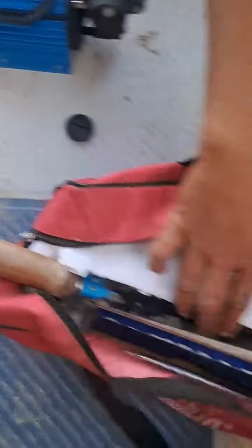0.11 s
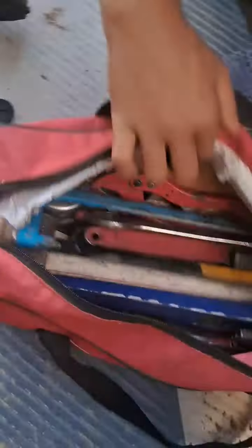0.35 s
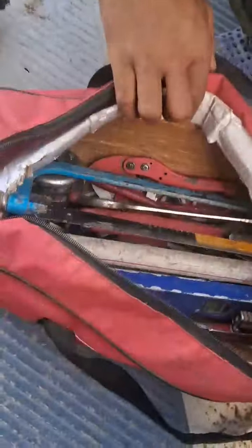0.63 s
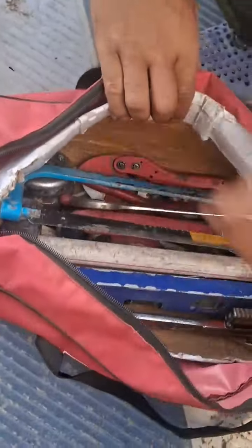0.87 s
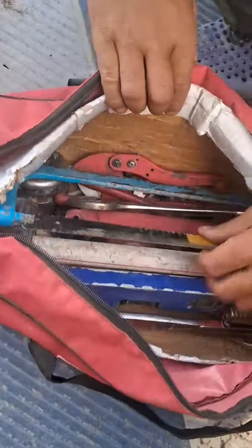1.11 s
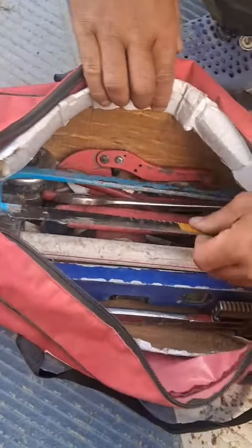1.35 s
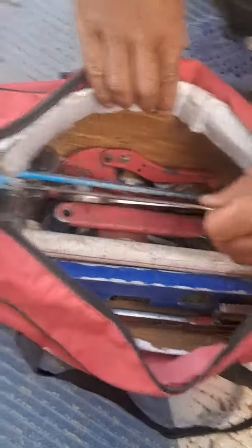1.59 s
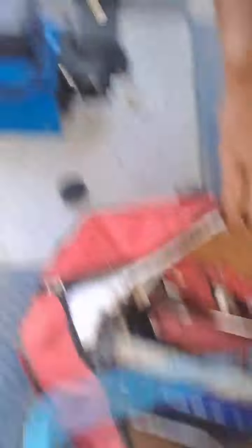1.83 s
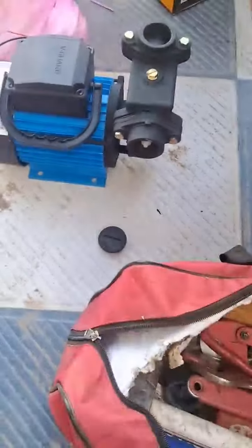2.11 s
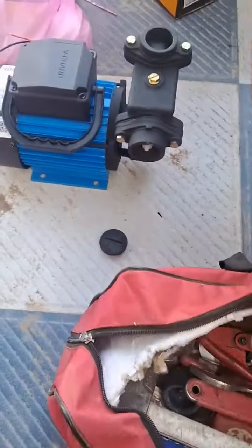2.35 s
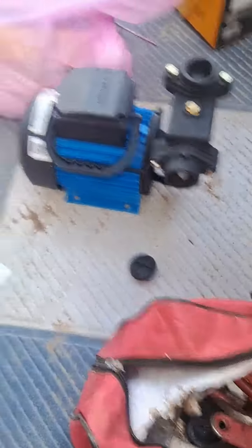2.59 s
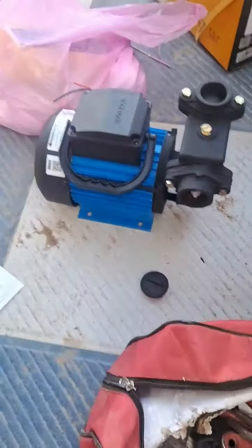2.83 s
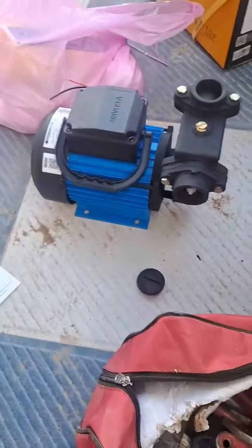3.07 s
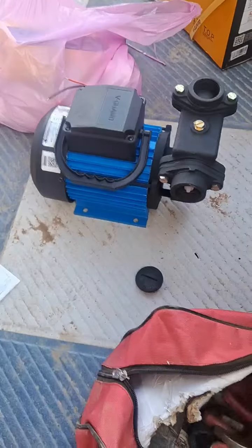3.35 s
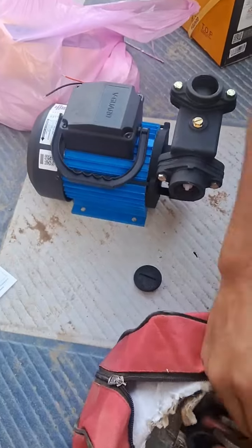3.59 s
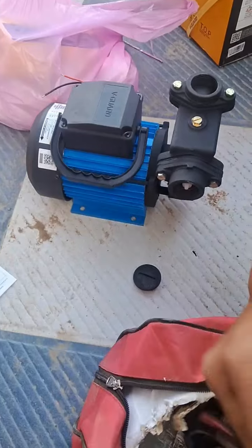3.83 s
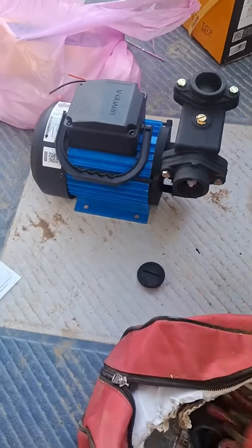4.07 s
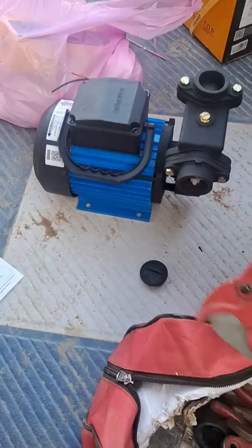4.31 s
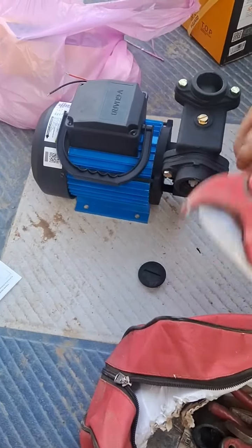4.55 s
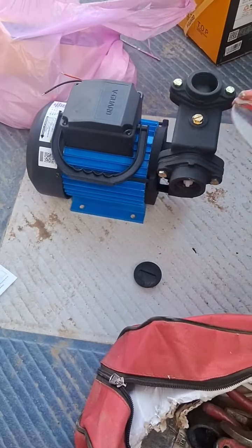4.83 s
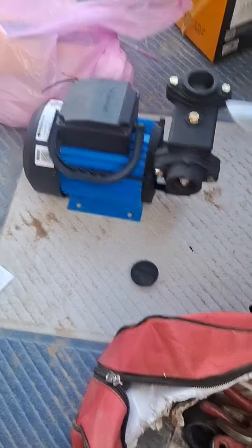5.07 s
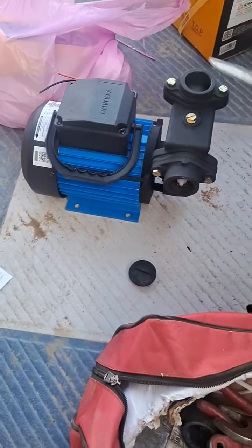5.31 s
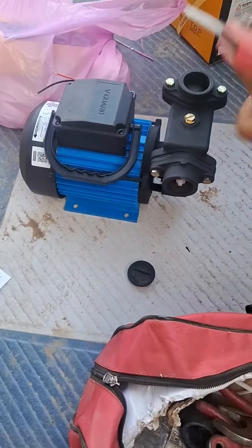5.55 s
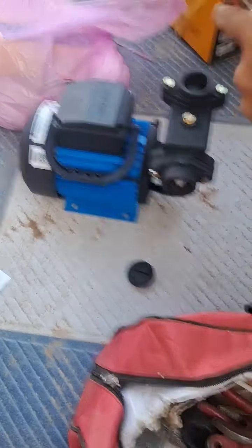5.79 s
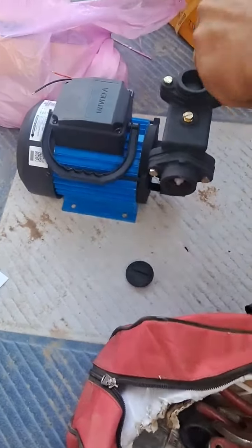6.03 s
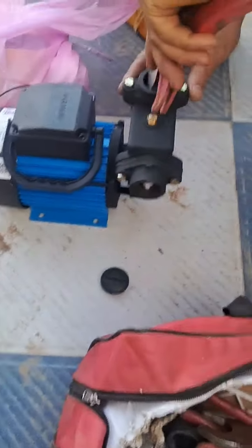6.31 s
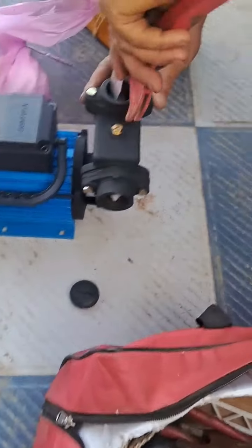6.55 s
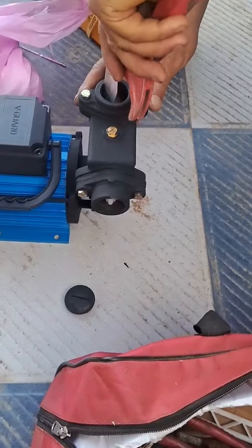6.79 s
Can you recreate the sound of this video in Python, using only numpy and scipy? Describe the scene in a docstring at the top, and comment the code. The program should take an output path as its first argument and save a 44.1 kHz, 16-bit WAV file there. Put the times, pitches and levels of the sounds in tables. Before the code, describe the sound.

Close to a phone microphone, a hand shoves through a loaded fabric bag on a tiled floor. Cloth drags and rustles over low thumps while steel tools clack dully. A denser clatter peaks around the middle with a clear bright bar ring. A small cutter then clicks sharply several times, followed by sparse small ticks, one soft dull knock and barely audible scuffs over low rumble and hiss.

```python
"""Digging through a bag of steel tools

A hand digs through a canvas bag of tools on a tiled floor, close to a two-port phone microphone.
Cloth rustles as random slips, the loaded bag thumps as decaying sines, tools clack as noise bursts that ring
damped modes. A steel bar rings out, then a ratchet pipe cutter is lifted, clicked open and set to a pipe
while the scene falls quiet, with a late dull knock and faint scuffs, over low rumble and hiss."""
import sys
import numpy as np
from scipy import signal
from scipy.fft import rfft, irfft, next_fast_len
from scipy.io import wavfile
from scipy.ndimage import uniform_filter1d

SR = 44100
rng = np.random.default_rng(int(sys.argv[2]) if len(sys.argv) > 2 else 0)


def amplitude_ratio(level_db):
    """Convert a level in decibels to the matching linear amplitude (field) ratio."""
    exponent = np.asarray(level_db, float) / 20
    return 10 ** exponent


def generate_wav(sig):
    """Save sig (samples, or channels by samples) to the path in sys.argv[1] as 16-bit PCM at SR."""
    pcm = np.round(np.clip(np.atleast_2d(sig).T, -1, 1) * 32767).astype(np.int16)
    wavfile.write(sys.argv[1], SR, pcm)


N = 304719

# Tools clack in the pile; the last row is a dull knock late in the quiet. Each row: time in seconds,
# level in dB, favoured pitch of the spot struck in Hz, brightness in dB per octave, chatter in seconds.
CLACKS = [(.1952, -49, 5640, 1, 0.017), (.2222, -23, 885, -11.5, 0.0018),
          (.3208, -31.5, 1210, -10.5, 0.0029), (.3597, -25.5, 13400, 4, 0.0032),
          (.376, -40, 4930, -1, 0.0029), (.4332, -22, 4380, -1, 0.0018), (.564, -22, 2030, -12.5, 0.0044),
          (.5914, -34.5, 2160, -5.5, 0.0072), (.693, -49, 1320, 13, 0.042), (.8624, -39, 3490, -3, 0.019),
          (1.5598, -35.5, 1310, -2, 0.021), (1.6012, -36, 12550, -1.5, 0.0086),
          (1.9629, -14.5, 2070, -4.7, 0.0035), (1.9741, -23.5, 3610, 2.8, 0.0041),
          (2.019, -40.5, 1350, 12.5, 0.0059), (2.143, -38, 8700, 10, 0.0033),
          (2.179, -33.5, 940, -12, 0.0035), (2.4502, -43, 1180, -2.5, 0.0065),
          (2.5119, -36.5, 1850, -7.5, 0.002), (2.6678, -48, 3900, -0.5, 0.0054),
          (2.7486, -38.5, 1860, -7.5, 0.0061), (2.764, -28.5, 1850, 0.5, 0.001),
          (2.9465, -29.5, 7700, 3, 0.037), (2.9706, -24, 2000, 4, 0.0049), (3.012, -21, 970, 1.4, 0.0097),
          (3.0394, -34, 5220, 2, 0.012), (3.122, -40, 970, -2.2, 0.0027), (3.14, -36, 980, -4, .016),
          (3.3496, -39, 2020, -1.3, 0.029), (3.3872, -29.5, 2720, -3.7, 0.0073),
          (3.3993, -34, 7630, -4, 0.011), (3.4381, -31, 3120, -1.9, 0.013), (3.4705, -28, 3540, 4.2, 0.01),
          (3.48, -26, 4870, 5, 0.0062), (3.5019, -16, 3330, -0.5, 0.0011), (3.5306, -33, 1270, -3, 0.011),
          (3.5778, -21.5, 2110, 1, 0.013), (3.6094, -23, 1030, -1, 0.0033),
          (3.6626, -22, 5330, 2.7, 0.0013), (3.8188, -35, 2700, -8.5, .02),
          (3.8447, -21.5, 5000, -2.5, 0.025), (3.861, -16, 1990, -8, 0.003), (3.9204, -28, 5200, 3, 0.021),
          (4.0, -44, 3686, -1, 0.0088), (5.846, -39.5, 1300, -8, .0015)]
# Blows on the steel bar, the last one with the bar free. Each row: time in seconds, level in dB,
# pitch of the spot struck in Hz, brightness in dB per octave, chatter in seconds.
BAR_BLOWS = [(1.7639, -22.5, 4997, 1.8, 0.061), (1.8532, -30.5, 5046, 0.63, 0.036),
             (3.8591, -19, 4970, 0.77, 0.048)]
# The cutter clicks. Each row: time in seconds, level in dB, favoured pitch in Hz, chatter in seconds.
CLICKS = [(4.2746, -29.5, 5540, 0.0075), (4.2816, -16.5, 3630, 0.012), (4.321, -28, 4770, 0.0019),
          (4.342, -17, 5300, .004), (4.4018, -37, 5140, 0.003), (4.4126, -29, 4530, 0.002),
          (4.4332, -17.5, 4400, .005), (4.554, -36.5, 4370, 0.001), (4.647, -39, 2080, .003),
          (4.688, -18.5, 2018, 0.0034), (4.8377, -36, 1820, 0.004), (4.8703, -45.5, 1700, .004),
          (4.9561, -39.5, 2010, 0.0034), (5.113, -57, 4830, .003), (5.1502, -50, 2070, 0.0027),
          (5.5196, -36, 3490, 0.0096), (5.645, -36, 4910, 0.0063), (5.7195, -35.5, 6450, .004),
          (5.7293, -36.5, 3500, 0.011), (5.7478, -39.5, 1680, 0.0061), (5.8205, -38, 3370, 0.0065),
          (5.8421, -39.5, 1280, 0.0018), (6.1203, -57.5, 2990, .004), (6.3012, -59, 3070, .004),
          (6.3417, -47, 4820, .006), (6.6057, -47.5, 4700, 0.0057)]
# A tool left free sings one note. Each row: start in seconds, level in dB, pitch in Hz, T60 in seconds.
TINGS = [(.075, -55, 9500, 0.11), (0.194, -50, 5640, 0.4), (.433, -43, 14580, 0.36),
         (.865, -53.5, 8200, 0.14), (1.603, -40, 12500, 0.047), (1.973, -34.5, 5310, 0.13),
         (1.99, -34, 13100, .072), (3.402, -36, 7580, .07), (4.284, -44, 3080, 0.23),
         (4.435, -44, 7500, 0.064), (4.554, -49.5, 4365, 0.093), (4.281, -18.5, 4960, 0.054),
         (4.839, -37.5, 1720, 0.13), (4.87, -45.5, 1790, 0.083), (5.22, -71, 4600, 0.16),
         (5.522, -46.5, 3105, 0.38), (5.647, -47, 3100, 0.15)]
# Modes of the damped steel pile. Each row: frequency in Hz, relative level in dB.
PILE_MODES = [(1000, 0.5), (1300, -5.1), (1550, -7.5), (1950, 0), (2290, -4), (2700, -4), (3200, -7),
              (3700, 1.1), (4480, 4.5), (5000, 4.5), (6500, -12.5), (8440, 1), (10300, -2), (12700, 1.9),
              (14200, -1.5)]
# Modes of the cutter. Each row: frequency in Hz, relative level in dB.
CUTTER_MODES = [(1250, -19.5), (1710, -10), (2030, 2.6), (3100, 11.5), (3460, 5.8), (3750, 9), (4390, 11.5),
                (5000, 6.5), (5340, 10), (6500, -13.5), (7400, -14), (9100, -5), (11200, -3.3),
                (13000, -10), (15080, -11.5)]
# Modes of the free bar. Each row: frequency in Hz, relative level in dB, T60 in seconds.
BAR_MODES = [(1572, -28, 0.19), (1938, -30, 0.21), (2714, -14, 0.1), (2746, -14, 0.1), (3100, -30, .25),
             (3806, -32, 0.3), (4378, -8, 0.14), (4748, -35, 0.41), (4968, -9, 0.55), (5448, -24, 0.15),
             (6481, -30, 0.19), (6831, -45, 0.34), (7506, -15, 0.1), (7604, -14, 0.14), (7784, -34, 0.19),
             (8482, -21, 0.33), (9354, -22, 0.27), (9449, -22, 0.25), (10000, -20, 0.17),
             (10800, -26, 0.21), (11510, -37, 0.23), (12070, -46, 0.24), (13070, -30, 0.24),
             (13530, -32, 0.17), (14580, -29, 0.15), (15130, -24, 0.14), (15460, -57, 0.33)]
# Contact crack of pile and bar. Each row: frequency in Hz, relative density in dB per Hz.
CRACK_SPECTRUM = [(290, -54.5), (500, -21), (1060, -13), (1300, -28.5), (1930, -2.5), (2890, -10),
                  (3200, -6), (6700, -10), (12500, -13), (16000, -23)]
# Contact crack of the cutter. Each row: frequency in Hz, relative density in dB per Hz.
SNAP_SPECTRUM = [(590, -64), (1000, -39), (2870, -27.5), (3710, 2), (4020, -9.5), (5020, -10.5),
                 (7880, -10), (15100, -10.5), (16000, -41)]
# The hand shoves through the bag; the last three rows are faint scuffs in the quiet. Each row: centre in
# seconds, load shifting in dB, cloth drag in dB, hold in seconds, fine fizz in dB.
SHOVES_AND_SCUFFS = [(.02, -43.5, -52.5, 0.17, -60), (.1, -42, -68, 0.025, -58.5),
                     (.23, -39, -53.5, 0.068, -57), (.45, -33.5, -42.5, 0.19, -47.5),
                     (.7, -45, -58, 0.12, -69.5), (.95, -58, -63.5, 0.3, -75),
                     (1.17, -43.5, -48, 0.086, -60), (1.42, -43, -52.5, 0.021, -60),
                     (1.56, -37, -54, 0.0067, -56), (1.8, -30, -36.5, 0.02, -43),
                     (1.95, -30.5, -39.5, 0.092, -44.5), (2.18, -43.5, -59.5, 0.1, -60.5),
                     (2.32, -67, -67.5, 0.087, -74.5), (2.47, -41, -52, 0.03, -57),
                     (2.76, -37.5, -53.5, 0.019, -62), (3.0, -31, -42.5, 0.013, -44),
                     (3.2, -46, -54, 0.37, -60.5), (3.5, -47, -46.5, 0.071, -50.5),
                     (3.6, -29.5, -37.5, 0.0084, -53), (3.88, -39, -43.5, 0.029, -46.5),
                     (6.2, -64.5, -79, .04, -101), (6.36, -64, -70.5, 0.029, -87),
                     (6.63, -67, -72, 0.032, -90.5)]
# Fingers slide on the cutter. Each row: centre in seconds, scrape in dB, fizz in dB, hold in seconds.
SLIDES = [(4.45, -58.5, -66, .02), (4.86, -59.5, -64.5, 0.052), (4.96, -57, -58, 0.025),
          (5.15, -70.5, -79, 0.042), (5.39, -79, -67, 0.047), (5.58, -73, -62, 0.065),
          (5.74, -63.5, -57, .03), (5.93, -70.5, -71, .08), (6.35, -91, -77, 0.021),
          (6.61, -106, -72, 0.019)]
# Coarse cloth drag. Each row: frequency in Hz, relative density in dB per Hz.
DRAG_SPECTRUM = [(290, -26), (500, -8), (629, -8.5), (1290, -9), (1510, -13.5), (1930, -11.5),
                 (2510, -17.5), (2870, -22.5), (6000, -29.5), (7800, -62), (13200, -120)]
# Gritty scrape. Each row: frequency in Hz, relative density in dB per Hz.
SCRAPE_SPECTRUM = [(530, -47), (900, -15.5), (1400, -11), (1750, -2), (2100, -2.5), (2630, -16), (3030, -5),
                   (4160, -15.5), (6000, -14), (7800, -45), (13200, -120)]
# Fine fizz. Each row: frequency in Hz, relative density in dB per Hz.
FIZZ_SPECTRUM = [(2060, -23), (3500, -6.5), (4540, -12), (4900, -7.5), (5290, -12), (8800, -14),
                 (13100, -12), (16000, -19.5)]
# Low thumps of the load; the last is the low body of a late knock. Each row: start in seconds,
# level in dB, pitch in Hz.
THUMPS = [(.023, -28.5, 260), (0.086, -28.5, 281), (0.221, -29, 390), (.265, -26, 380), (0.443, -21.5, 284),
          (0.568, -19.5, 277), (0.634, -24, 206), (.68, -29, 202), (0.707, -19.5, 190), (0.864, -34.5, 279),
          (1.55, -35, 377), (1.737, -34, 285), (1.801, -19, 229), (1.853, -23, 540), (1.962, -33, 191),
          (2.177, -34.5, 243), (2.453, -25.5, 370), (2.625, -35.5, 302), (2.745, -23, 302),
          (2.965, -23.5, 318), (3.008, -22, 315), (3.179, -29.5, 274), (3.475, -19.5, 318),
          (3.503, -15.5, 349), (3.594, -13.5, 299), (3.856, -30.5, 287), (4.039, -45.5, 397),
          (5.846, -31, 109.4)]
# The loaded bag. Each row: frequency in Hz, relative density in dB per Hz.
BODY_SPECTRUM = [(65, -27), (110, -1.5), (209, -3), (285, 1.5), (371, -1), (450, -6.5), (498, -4.5),
                 (609, -17.5), (700, -22.5), (910, -39.5), (1540, -120)]
# The hand on the phone. Each row: time in seconds, rumble in dB.
SHAKE = [(0.0, -57), (.2, -56), (0.338, -39.5), (.56, -48), (0.738, -36.5), (.9, -59.5), (4.1, -59.5),
         (5.75, -67.5), (5.85, -49), (5.95, -56.5), (6.6, -64.5), (6.74, -52.5), (6.91, -57)]
# Low rumble. Each row: frequency in Hz, relative density in dB per Hz.
RUMBLE_SPECTRUM = [(13, -55.5), (22, -17), (42, -9.5), (54, 1.5), (92, 1), (124, 1), (160, -5),
                   (210, -26.5), (350, -120)]
# Background air. Each row: frequency in Hz, relative density in dB per Hz.
AIR_SPECTRUM = [(15, -45.5), (25, -15), (59, -2.5), (123, -27), (249, -17.5), (450, -28), (600, -42.5),
                (800, -49.5), (2050, -47.5), (2610, -47.5), (2840, -51.5), (4140, -57.5), (4490, -45.5),
                (4870, -55.5), (7700, -64.5), (8000, -52), (8300, -64.5), (16000, -80)]
# Likeness of the two ports. Each row: frequency in Hz, left-right likeness from 0 to 1.
LIKENESS = [(40, 0.99), (200, 0.96), (400, 0.99), (800, 0.15), (5000, 0.087), (15000, 0.2)]
# The ports hear differently. Each row: frequency in Hz, left over right in dB.
LEAN = [(60, -3), (120, -1.5), (240, -3), (480, -6.5), (950, 2.5), (1890, -4.5), (3770, -2.5), (7520, 0.5),
        (15000, 3)]
# Phase between the ports. Each row: frequency in Hz, lag of the left port in radians.
LAG = [(100, 0.13), (300, 0.1), (700, 0.22), (16000, 1)]

PILE_T60_S, CUTTER_T60_S, THUMP_T60_S, ROOM_T60_S = .016, .026, .055, .035
CLICK_BRIGHT_DB_PER_OCT = -1.3
CUTTER_LOW_HZ = 1050  # the cutter's clicks carry little below this
SHOVE_RISE_DB_S, SHOVE_FALL_DB_S = 174, 193
SLIDE_RISE_DB_S, SLIDE_FALL_DB_S, RESTING_DB = 219, 207, -81.5
BAG_RUMBLE_DB = -19  # relative to the load shifting
ROOM_DB, AIR_DB = -2, -59.5


def evened(x):
    """Scales to rms 1."""
    return x / np.sqrt(np.mean(x ** 2) + 1e-20)


def read(points, hz):
    """Reads a curve on a log-frequency axis."""
    f, value = np.transpose(points)
    return np.interp(np.log(hz + 1), np.log(f + 1), value)


def colour(x, points):
    """Shapes the last axis by a spectrum."""
    size = next_fast_len(x.shape[-1])
    gain = amplitude_ratio(read(points, np.fft.rfftfreq(size, 1 / SR)))
    return irfft(rfft(x, size) * gain, size)[..., :x.shape[-1]]


def add(mix, start_s, sound):
    """Mixes a sound in at a time."""
    part = mix[..., round(start_s * SR):][..., :sound.shape[-1]]
    part += sound[..., :part.shape[-1]]


def grains(per_s, spread_db):
    """Sparse slips of random sign and exponentially spread level, bunched in time."""
    bunch = amplitude_ratio(1.53 * evened(uniform_filter1d(rng.standard_normal(N), 500)))
    spread = amplitude_ratio(spread_db * np.minimum(rng.exponential(1, (2, N)), 4))
    size = spread * rng.standard_normal((2, N))
    return bunch * size * (rng.random((2, N)) < per_s / SR)


def strokes(rows, index, rise_db_s, fall_db_s):
    """Each stroke swells, holds and dies away at steady slopes; their powers add up to one gain."""
    t, power = np.arange(0, N + 64, 64) / SR, 0
    for row in rows:
        centre_s, half_hold_s = row[0], row[3] / 2
        before = np.maximum(centre_s - half_hold_s - t, 0)
        after = np.maximum(t - centre_s - half_hold_s, 0)
        power = power + amplitude_ratio(row[index] - rise_db_s * before - fall_db_s * after) ** 2
    return np.interp(np.arange(N) / SR, t, np.sqrt(power))


def strike(rows, modes, crack_spectrum, near_db, ring_db, settle_db, loose, square, solid=0):
    """A contact burst cracks and rings the modes, those near the given pitch raised or lowered by near_db."""
    out, t = np.zeros((2, N)), np.arange(SR // 2) / SR
    hz, db, t60 = np.transpose(modes)[..., None]
    long = t[:round(min(.49, t60.max()) * SR)]
    short = t[:4096]
    u = np.maximum(short - 128 / SR, 0)  # time since contact
    for s, level_db, spot_hz, bright_db, chatter_s in rows:
        noise, luck = rng.standard_normal((3, 4096)), rng.standard_normal((2, len(hz), 1))

        attack = 1 - np.exp(-u / min(0.14 * chatter_s, .002))
        blow = attack * np.exp(-(u / chatter_s) ** square)
        settle = amplitude_ratio(settle_db) * np.exp(-u / 0.031) * (1 - short / t[4095])
        rattle = (1 - np.exp(-u / 0.0025)) * settle  # loose parts rattle on
        touch = blow + rattle

        octaves = np.log2(hz / spot_hz)
        near = np.exp(-(octaves / 0.1) ** 2)
        # grip and neighbours shift the modes
        pitch = near * spot_hz + (1 - near) * hz * (1 + loose * luck[0])
        mode_db = db + near_db * near + bright_db * octaves + 60 * loose * luck[1]
        rings = amplitude_ratio(mode_db - 60 * long / t60) * np.sin(2 * np.pi * pitch * long)

        drive = (1 - solid) * noise[2] * (blow + 0.47 * rattle)  # the rattle is too soft to ring much
        drive[160] += solid  # one clean blow
        ring = signal.fftconvolve(drive, rings.sum(0))
        ring = ring / np.sqrt(uniform_filter1d(ring ** 2, 128).max())
        sound = np.tile(amplitude_ratio(ring_db - 0.75 * np.log2(spot_hz / 2500)) * ring, (2, 1))

        tilted = [(f, d + bright_db * np.log2(f / spot_hz)) for f, d in crack_spectrum]
        crack = colour(touch * noise[:2], tilted)
        sound[:, :4096] += crack * np.linalg.norm(touch) / np.linalg.norm(crack[0])
        add(out, s - .004, amplitude_ratio(level_db - 9) * sound)
    return out


def pile():
    """Tools clack and a late knock sounds dully; the modes are damped within milliseconds."""
    modes = [(hz, db, PILE_T60_S) for hz, db in PILE_MODES]
    return strike(CLACKS, modes, CRACK_SPECTRUM, near_db=18.0, ring_db=-1.0,
                  settle_db=-16.5, loose=0.066, square=0.82)


def gripped_bar():
    """The bar is rubbed while held, so its modes ring short."""
    modes = [(hz, 10 * np.log10(t60) + .5 * db, 0.094 * t60) for hz, db, t60 in BAR_MODES]
    return strike(BAR_BLOWS[:2], modes, CRACK_SPECTRUM, near_db=6, ring_db=6.0,
                  settle_db=-11, loose=0.009, square=9.2)


def free_bar():
    """One clean blow lets the bar ring out at its own modes."""
    return strike(BAR_BLOWS[2:], BAR_MODES, CRACK_SPECTRUM, near_db=-3.0, ring_db=7.5,
                  settle_db=-15.5, loose=0, square=1.5, solid=1.0)


def cutter():
    """The cutter's clicks ring its short modes; a high-pass keeps them thin, with little below about 1 kHz."""
    clicks = [(s, db, hz, CLICK_BRIGHT_DB_PER_OCT, chatter_s) for s, db, hz, chatter_s in CLICKS]
    modes = [(hz, db, CUTTER_T60_S) for hz, db in CUTTER_MODES]
    sound = strike(clicks, modes, SNAP_SPECTRUM, near_db=21.5, ring_db=-6.5,
                   settle_db=-16.5, loose=.035, square=1.0)
    highpass = signal.butter(N=3, Wn=CUTTER_LOW_HZ, btype="high", fs=SR, output="sos")
    return signal.sosfilt(highpass, sound)


def tings():
    """Single clear notes: sines with a fast attack and exponential decay."""
    out, t = np.zeros((2, N)), np.arange(SR // 2) / SR
    for s, db, hz, t60 in TINGS:
        attack = 1 - np.exp(-t / 0.0011)
        add(out, s, attack * amplitude_ratio(db - 60 * t / t60) * np.sin(2 * np.pi * hz * t))
    return out


def cloth():
    """Random slips make a coarse drag, a gritty scrape and a fine fizz, down to the late scuffs."""
    drag = evened(colour(grains(per_s=1600.0, spread_db=0.5), DRAG_SPECTRUM))
    scrape = evened(colour(grains(per_s=1500.0, spread_db=-5.5), SCRAPE_SPECTRUM))
    fizz = evened(colour(grains(per_s=28000.0, spread_db=0.5), FIZZ_SPECTRUM))
    rub = strokes(SHOVES_AND_SCUFFS, 2, SHOVE_RISE_DB_S, SHOVE_FALL_DB_S)
    swish = strokes(SHOVES_AND_SCUFFS, 4, SHOVE_RISE_DB_S, SHOVE_FALL_DB_S)
    slide = strokes(SLIDES, 1, SLIDE_RISE_DB_S, SLIDE_FALL_DB_S) + amplitude_ratio(RESTING_DB)
    hiss = strokes(SLIDES, 2, SLIDE_RISE_DB_S, SLIDE_FALL_DB_S) + amplitude_ratio(RESTING_DB)
    return rub * drag + slide * scrape + (swish + hiss) * fizz


def load():
    """Low slips follow the shoves and scuffs, thumps are decaying sines, bag and hand rumble."""
    t = np.arange(6000) / SR
    shift = strokes(SHOVES_AND_SCUFFS, 1, SHOVE_RISE_DB_S, SHOVE_FALL_DB_S)
    out = shift * evened(colour(grains(per_s=450.0, spread_db=1.5), BODY_SPECTRUM))
    for s, db, hz in THUMPS:
        attack = 1 - np.exp(-t / 0.0015)
        add(out, s, attack * amplitude_ratio(db - 60 * t / THUMP_T60_S) * np.sin(2 * np.pi * hz * t))
    hand = amplitude_ratio(np.interp(np.arange(N) / SR, *np.transpose(SHAKE)))
    rumble = evened(colour(rng.standard_normal((2, N)), RUMBLE_SPECTRUM))
    return out + (hand + amplitude_ratio(BAG_RUMBLE_DB) * shift) * rumble


def room(x):
    """The floor and the bag's walls answer at once: sparse decaying echoes, different at each port."""
    t = np.arange(SR // 20) / SR
    taps = rng.standard_normal((2, len(t))) * (rng.random((2, len(t))) < .1) * (t > .001)
    tail = taps * amplitude_ratio(-60 * t / ROOM_T60_S)
    return signal.oaconvolve(x.mean(0)[None], tail / np.linalg.norm(tail[0]), axes=1)[:, :N]


def air():
    """The quiet: distant low rumble and microphone hiss as shaped noise."""
    return amplitude_ratio(AIR_DB) * evened(colour(rng.standard_normal((2, N)), AIR_SPECTRUM))


def scene():
    """Steel in its space, over cloth, load and air."""
    damped = pile() + gripped_bar() + cutter()
    free = free_bar() + tings()
    return damped + amplitude_ratio(ROOM_DB) * room(damped) + free + cloth() + load() + air()


def ports(x):
    """Two takes on the scene become a left-right pair: alike, lagging and leaning by frequency."""
    size = next_fast_len(N)
    hz, (a, b) = np.fft.rfftfreq(size, 1 / SR), rfft(x, size)
    same = np.clip(read(LIKENESS, hz), 0, 1)
    apart = amplitude_ratio(read(LEAN, hz) / 2) * np.exp(-.5j * read(LAG, hz))
    mean = (a + b) / 2
    half = (a - b) / 2 * np.sqrt((1 - same) * 2)
    return irfft(np.array([(mean + half) * apart, (mean - half) / apart]), size)[:, :N]


def low_pass(x):
    """Removes everything above the highest recorded frequency."""
    return signal.sosfilt(signal.butter(12, 16820, fs=SR, output="sos"), x)


def record(dry):
    """The two microphone ports hear the scene."""
    mix = ports(dry)
    return low_pass(mix)


dry = scene()
out = record(dry)
generate_wav(out)
```